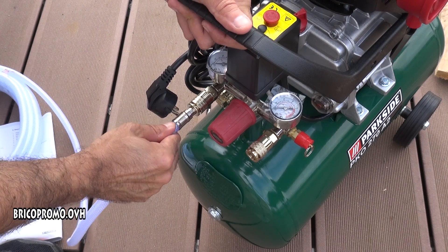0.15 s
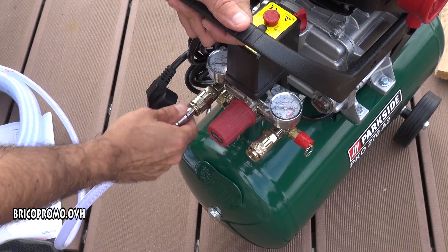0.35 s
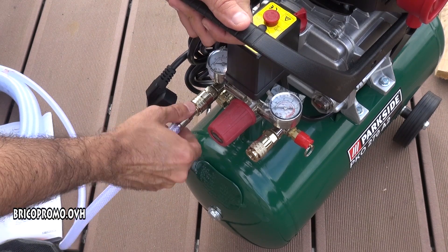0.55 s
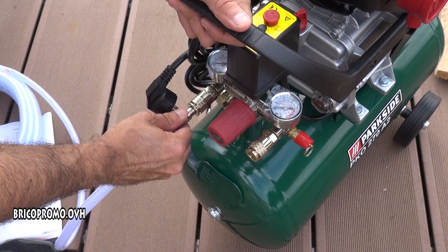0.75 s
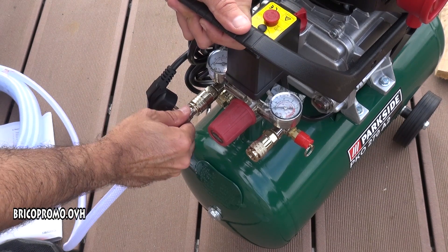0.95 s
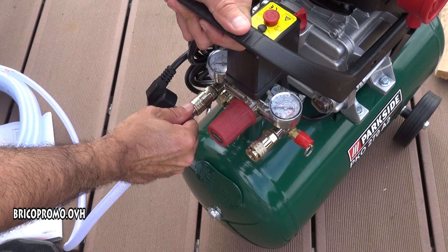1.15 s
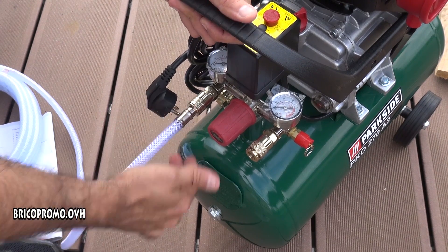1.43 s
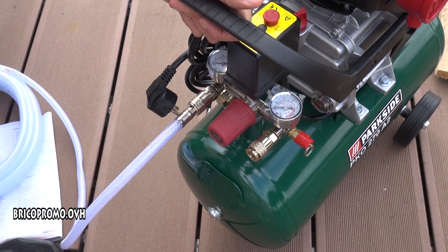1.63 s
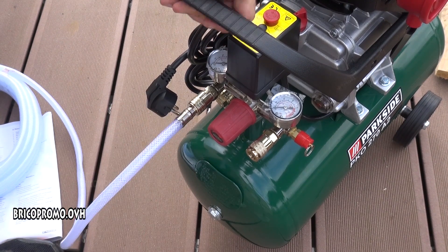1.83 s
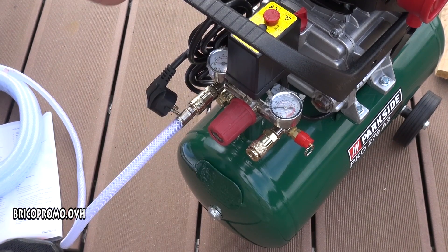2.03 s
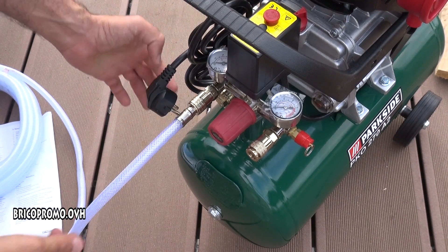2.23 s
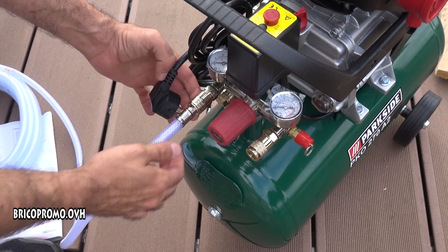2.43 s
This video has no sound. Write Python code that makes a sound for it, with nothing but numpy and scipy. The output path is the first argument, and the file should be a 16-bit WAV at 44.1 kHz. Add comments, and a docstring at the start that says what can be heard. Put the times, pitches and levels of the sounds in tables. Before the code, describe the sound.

Close up on an outdoor deck, an air hose connector rattles and knocks against a coupling, snaps in with a metallic ring, followed by low thumps, a brief scrape and a hollow plastic tap over low wind rumble.

```python
"""Outdoors on a deck: wind buffets the microphone over a hush and a faint motor line; a far bird's whistle falls.
A hose fitting is worked into the brass quick coupling of a small compressor: light knocks, firm blows and
thin ticks, then a ball-lock snap rings sleeve, fitting and steel tank. Soft bumps come near the microphone,
a short scuff crosses the boards, and the plastic cover is knocked, then again faintly.
Struck parts are damped sines plus noise smeared by the contact; the rest is shaped noise and two tones."""
import sys
import numpy as np
from scipy import signal
from scipy.fft import rfft, irfft
from scipy.io import wavfile
from scipy.ndimage import map_coordinates

SR = 44100
rng = np.random.default_rng(int(sys.argv[2]) if len(sys.argv) > 2 else 0)


def file_out(sig):
    """Save sig as 16-bit WAV at sys.argv[1]."""
    # one column per channel
    cols = np.atleast_2d(sig).T
    # limit, then scale
    lim = np.clip(cols, -1, 1)
    pcm = np.round(lim * 32767).astype(np.int16)
    wavfile.write(sys.argv[1], SR, pcm)


def invert_db(x):
    """Field ratio 10**(x/20) for x, a level in decibels (scalar or array-like)."""
    u = np.asarray(x, float) / 20
    return 10 ** u


N = 114660

# gusts: t/s, thud level/dB, flutter level/dB
GUSTS = [(0, -23.5, -101), (.1, -39, -66.5), (.33, -25.5, -55), (.448, -21, -54.5), (.49, -29, -59.5),
         (.63, -31, -72), (.69, -28, -62.5), (.78, -16.5, -42.5), (.96, -25.5, -55), (1.02, -30, -84),
         (1.12, -32.5, -54), (1.25, -39.5, -72), (1.31, -24.5, -65), (1.4, -31, -57), (1.44, -20.5, -66),
         (1.51, -19, -65), (1.56, -24, -70.5), (1.66, -32.5, -53.5), (1.69, -21, -37), (1.79, -36, -48.5),
         (1.89, -26, -48.5), (2.08, -29.5, -63), (2.17, -24.5, -76.5), (2.33, -32.5, -78), (2.4, -46, -68),
         (2.47, -28, -74), (2.6, -46.5, -78)]
# wind spectra, relative: f/Hz, level/dB
THUD_SPECTRUM = [(8, 10.5), (20, 9), (50, -4), (80, -38.5)]
RUMBLE_SPECTRUM = [(45, -16.5), (80, 5.5), (140, -16), (200, -39)]
FLUTTER_SPECTRUM = [(110, -14.5), (160, 5), (300, -19), (500, -25.5)]
RUMBLE_OVER_MEAN_DB = 1  # over the dB mean of thud and flutter

# outdoor hush, relative density: f/Hz, level/dB per Hz
HUSH_SPECTRUM = [(250, -4.5), (1100, -13.5), (1900, -19), (3200, -19.5), (5500, -23), (7400, -31),
                 (15700, -36), (16500, -48.5)]
HUSH_DB, HUSH_FADE_DB_PER_S = -63.5, 1
MOTOR_HZ, MOTOR_DB = 1199, -74
BIRD_S, BIRD_HZ, BIRD_FALL_HZ_PER_S, BIRD_DB = 0.15, 8100, 6500, -79

# light knocks while the hand works the fitting: t/s, tank level/dB before PART_DB
LIGHT_KNOCKS = [(0.091, -39), (0.156, -39), (.215, -33.5), (.271, -40.5), (.331, -41), (.478, -37.5),
                (.747, -35.5), (.756, -35), (.805, -36.5), (0.822, -38), (.891, -37.5), (.902, -37.5),
                (1.422, -39), (1.438, -46), (1.458, -40.5)]
KNOCK_FITTING_DB, KNOCK_CONTACT_MS = -11, 1  # fitting relative to tank
KNOCK_GRIP_T60_S, KNOCK_LOWPASS_HZ = 0.8, 750
# firm blows: t/s, tank level/dB, fitting level/dB, sleeve level/dB (all before PART_DB), contact/ms
FIRM_BLOWS = [(0.3544, -17.5, -31, -54.5, 1.3), (0.526, -44.5, -45.5, -64, 1.2),
              (1.066, -36.5, -55.5, -86, 1.4), (1.0774, -40, -28, -50, 0.49),
              (1.0784, -20, -31.5, -58.5, 1.52), (1.108, -6.5, -6.5, -6, 0.54),
              (1.283, -32.5, -46.5, -68, 1.8), (1.2939, -24.5, -29.5, -55, 1.21)]
# mode pitches of tank, fitting, sleeve: f/Hz
TANK_HZ = [422, 485, 570, 637, 775, 890, 1058, 1385, 1485, 1615]
FITTING_HZ = [2110, 2632, 2836, 3663, 4070, 5470, 5701]
SLEEVE_HZ = [6466, 6793, 9680]
# their modes in the same order, relative to the part, before scatter and grip: level/dB, t60/s
TANK_MODES = [(-11.5, 0.27), (2.5, 0.077), (-14.5, 0.48), (-5, 0.13), (-3.5, 0.28), (-15.5, 0.17),
              (-18.5, 0.058), (-8, 0.12), (-12.5, 0.2), (-23, 0.3)]
FITTING_MODES = [(-19.5, 0.13), (-8.5, 0.28), (9.5, 0.035), (-4, 0.086), (-13.5, 0.25), (-12.5, 0.25),
                 (-14, 0.083)]
SLEEVE_MODES = [(-14, 0.17), (-11.5, 0.079), (7, 0.034)]
# bands of the many small modes of tank, fitting, sleeve: low f/Hz, high f/Hz, top f/Hz of the crack
DENSE_BANDS = [(400, 1600, 1200), (2050, 5900, 3900), (5900, 13000, 16000)]
# their crack and rattle, relative to the part: crack level/dB, crack t60/s, rattle level/dB, rattle t60/s
DENSE_DECAYS = [(3, 0.041, -6.5, 0.18), (11.27, 0.015, -0.5, 0.2), (20, 0.002, -1, 0.14)]
PART_DB = -9
SWARM_MODES, SWARM_SHARE = 140, 0.35  # share of the rattle that is discrete modes
LOW_EDGE_HZ = 375  # small parts radiate little lower
GRIP_DB_PER_MS, GRIP_LONG_S = 4, 0.25  # slower contact: stiller rattle; a mode of this t60 loses it in full
SHELL_HZ = 775  # main tank mode, spared by the grip
MODE_SCATTER_DB, MODE_ROUGH, SWELL_CYCLES = 1.5, 0.6, 0.66
RISE_PER_CONTACT = 0.1  # longer contacts start softer

# ticks of balls, spring and grit: t/s, level/dB, f/Hz near the top of the band
TICKS = [(.325, -58.5, 4930), (0.459, -61.5, 5150), (0.744, -54, 7500), (0.801, -58, 7160),
         (0.819, -56, 3600), (1.679, -52.5, 3480), (1.685, -59.5, 6550), (1.717, -62, 4460),
         (2.497, -64, 4800)]

# soft low bumps near the microphone: t/s, level/dB, f/Hz
THUMPS = [(1.4, -37, 210), (1.682, -24.5, 90), (1.691, -33, 298.4)]
THUMP_CYCLES = 40  # cycles to fall 60 dB

# stroke on the boards: t/s, body level/dB, air level/dB
SCUFF_STROKE = [(1.85, -77.5, -86), (1.916, -68.5, -71), (1.95, -50.5, -61), (1.98, -42.5, -56),
                (2.008, -39, -55.5), (2.03, -54.5, -61.5), (2.044, -41, -60), (2.058, -46.5, -52.5),
                (2.1, -61.5, -64), (2.11, -81, -101)]
# scuff spectra, relative density: f/Hz, level/dB per Hz
SCUFF_BODY_SPECTRUM = [(900, -13), (1700, -8), (2400, 0), (2900, 4.5), (3800, -4), (5500, -12), (7000, -32)]
SCUFF_AIR_SPECTRUM = [(5000, 17), (8000, 3), (11000, 5.5), (15500, -2)]

# knocks on the plastic cover: t/s, level/dB
COVER_KNOCKS = [(2.383, -23.5), (2.498, -44)]
# cover mode pitches: f/Hz
COVER_HZ = [328, 528, 615, 777, 910, 1345]
# cover modes in the same order, relative to the knock, before scatter: level/dB, t60/s
COVER_MODES = [(-20.5, 0.12), (3, 0.055), (-15, 0.1), (-23, 0.57), (-10.5, 0.042), (-13, 0.057)]
COVER_TICK_DB, COVER_RATTLE_DB, COVER_DULL_DB = -19, -29.5, -23  # relative to the knock

CLIP_LEVEL, LOWPASS_HZ = 1.05, 16400


def unit(x):
    """Scale to rms 1."""
    return x / np.sqrt(np.mean(x ** 2) + 1e-20)


def curves(rows):
    """Interpolate each column after the time to one value per sample."""
    s, *cols = np.transpose(rows)
    return [np.interp(np.arange(N) / SR, s, c) for c in cols]


def wobble(rate_hz):
    """Smooth random curve, rate_hz knots a second."""
    knots = rng.standard_normal(int(N * rate_hz / SR) + 4)
    return map_coordinates(knots, [np.arange(N) * rate_hz / SR])


def noise(spectrum):
    """Noise of rms 1 with a (Hz, dB) spectrum, falling 40 dB in the octave outside it."""
    f, db = np.transpose(spectrum)
    f = np.r_[f[0] / 2, f, f[-1] * 2]
    db = np.r_[db[0] - 40, db, db[-1] - 40]
    hz = np.fft.rfftfreq(N, 1 / SR) + 1
    gain = invert_db(np.interp(np.log(hz), np.log(f), db))
    return unit(irfft(rfft(rng.standard_normal(N)) * gain, N))


def band(size, lo_hz, hi_hz):
    """Stretch of band noise of rms 1."""
    hz = np.fft.rfftfreq(size, 1 / SR) + 1
    loss = np.sqrt((1 + (lo_hz / hz) ** 12) * (1 + (hz / hi_hz) ** 12))
    return unit(irfft(rfft(rng.standard_normal(size)) / loss, size))


def decay(t, db, t60_s):
    """Exponential fall from db, losing 60 dB in t60_s."""
    return invert_db(db - 60 * t / t60_s)


def lumpy(spectrum, depth_db, rate_hz):
    """Shaped noise of rms 1 with a randomly swaying level."""
    return unit(noise(spectrum) * invert_db(depth_db * wobble(rate_hz)))


def wind():
    """Pressure lumps on the microphone: thud, a fluttering top and the rumble between them."""
    thud_db, flutter_db = curves(GUSTS)
    rumble_db = (thud_db + flutter_db) / 2 + RUMBLE_OVER_MEAN_DB
    thud = invert_db(thud_db) * noise(THUD_SPECTRUM)
    rumble = invert_db(rumble_db) * lumpy(RUMBLE_SPECTRUM, 1.0, 5.9)
    return thud + rumble + invert_db(flutter_db) * lumpy(FLUTTER_SPECTRUM, 3.2, 24)


def outdoors():
    """Slowly fading hush, a faint unsteady motor line and a far bird's falling, dying whistle."""
    t = np.arange(N) / SR
    hush_db = HUSH_DB - HUSH_FADE_DB_PER_S * t + 1.5 * wobble(6)
    motor_phase = 2 * np.pi * MOTOR_HZ * t + 0.77 * wobble(36)
    motor = invert_db(MOTOR_DB + 0.72 * wobble(11)) * np.sin(motor_phase)
    bird_cycles = BIRD_HZ * t - BIRD_FALL_HZ_PER_S * t * t / 2
    bird = np.clip(1 - t / BIRD_S, 0, 1) * np.sin(2 * np.pi * bird_cycles)
    return invert_db(hush_db) * noise(HUSH_SPECTRUM) + motor + invert_db(BIRD_DB) * bird


def ring(pitches_hz, modes, t, grip_db=0):
    """Damped sines, quick to swell, beating unevenly; a grip lowers the long modes most, the shell not at all."""
    hz = np.array(pitches_hz)[:, None]
    db, t60 = np.transpose(modes)[:, :, None]
    luck = rng.standard_normal((3, len(modes), 1))
    beat = 1 + MODE_ROUGH * np.sin(hz ** 2 / 2e5 * luck[1] * t) * np.cos(hz / 16 * luck[2] * t)
    grip_loss_db = grip_db * t60 / GRIP_LONG_S * (hz != SHELL_HZ)
    fall = decay(t, db + MODE_SCATTER_DB * luck[0] - grip_loss_db, t60)
    swell = 1 - np.exp(-t * hz / SWELL_CYCLES)
    return np.sum(fall * beat * swell * np.sin(2 * np.pi * hz * t), axis=0)


def add(track, s, sound, contact_ms):
    """Lay a sound in at s, smeared by a scratchy, colourless contact peaking near contact_ms."""
    u = np.arange(1024) / SR * 1000 / contact_ms
    shape, push = u * np.exp(-u), rng.standard_normal(len(u))
    for _ in range(16):  # alternate between the time envelope and a flat spectrum
        z = rfft(push * np.sqrt(shape))
        push = irfft(z / np.abs(z))
    t_ms = np.arange(len(sound)) / SR * 1000
    rise = 1 - np.exp(-(t_ms / (RISE_PER_CONTACT * contact_ms)) ** 2)
    hit = signal.fftconvolve(sound * rise, push / np.linalg.norm(push))
    track[round(s * SR):][:len(hit)] += hit


def swarm(t, lo_hz, hi_hz, t60_s):
    """Crowd of small modes scattered over a band; the higher tend to die sooner."""
    place, size, life, phase = rng.random((4, SWARM_MODES, 1))
    hz = lo_hz + (hi_hz - lo_hz) * place
    fade = decay(t, -8 * size, t60_s * (1.5 - 0.46 * place) * (0.51 + 0.65 * life))
    return np.sum(fade * np.sin(2 * np.pi * (hz * t + phase)), axis=0) * np.sqrt(4 / SWARM_MODES)


def struck(t, swarms, contact_ms, *levels_db):
    """Tank, fitting and sleeve answer one blow: main modes, a crack and a dense rattle."""
    grip_db = GRIP_DB_PER_MS * contact_ms
    pitches = TANK_HZ, FITTING_HZ, SLEEVE_HZ
    mode_sets = TANK_MODES, FITTING_MODES, SLEEVE_MODES
    parts = zip(levels_db, pitches, mode_sets, DENSE_BANDS, DENSE_DECAYS, swarms)
    out = np.zeros(len(t))
    for db, hz, modes, (lo, hi, top), (crack_db, crack_t60, rattle_db, rattle_t60), crowd in parts:
        modal = ring(hz, modes, t, grip_db)
        crack = decay(t, crack_db, crack_t60) * band(len(t), lo, top)
        discrete = invert_db(rattle_db) * crowd[:len(t)]
        diffuse = decay(t, rattle_db, rattle_t60) * band(len(t), lo, hi)
        rattle = SWARM_SHARE * discrete + (1 - SWARM_SHARE) * diffuse
        out += invert_db(db + PART_DB) * (modal + crack + invert_db(-grip_db) * rattle)
    return out


def coupling():
    """Light knocks are dulled and further damped by the grip; firm blows ring on, the snap the loudest."""
    firm, light, t = np.zeros(N + SR), np.zeros(N + SR), np.arange(16384) / SR
    swarms = [swarm(t, lo, hi, t60) for (lo, hi, _), (*_, t60) in zip(DENSE_BANDS, DENSE_DECAYS)]
    for s, *levels_db, contact_ms in FIRM_BLOWS:
        add(firm, s, struck(t, swarms, contact_ms, *levels_db), contact_ms)
    t = t[:8192]
    grip = decay(t, 0, KNOCK_GRIP_T60_S)
    for s, db in LIGHT_KNOCKS:  # tank and fitting only
        knock = struck(t, swarms, KNOCK_CONTACT_MS, db, db + KNOCK_FITTING_DB)
        add(light, s, grip * knock, KNOCK_CONTACT_MS)
    dull = signal.lfilter(*signal.butter(1, KNOCK_LOWPASS_HZ, fs=SR), light)
    both = (firm + dull)[:N]
    return signal.sosfilt(signal.butter(4, LOW_EDGE_HZ, "high", fs=SR, output="sos"), both)


def ticks():
    """Thin ticks of balls, spring and grit: a pitched band of noise under a brief broad click."""
    out, t = np.zeros(N + SR), np.arange(SR // 3) / SR
    for s, db, hz in TICKS:
        pitched = decay(t, db, 0.078) * band(len(t), hz / 1.58, hz * 1.06)
        click = decay(t, db + 1, 0.0086) * band(len(t), 1200, 10400)
        add(out, s, pitched + click, contact_ms=0.53)
    return out[:N]


def thumps():
    """Dull bumps: low band noise with a soft start; the higher ones die sooner."""
    out, t = np.zeros(N + SR), np.arange(SR // 3) / SR
    for s, db, hz in THUMPS:
        envelope = decay(t, db, THUMP_CYCLES / hz) * (1 - np.exp(-t * hz / 2))
        add(out, s, envelope * band(len(t), hz / 1.3, hz * 1.27), contact_ms=2.7)
    return out[:N]


def scuff():
    """Friction: a throaty body and an airy top, both grainy, under one stroke."""
    body_db, air_db = curves(SCUFF_STROKE)
    on = np.arange(N) / SR > SCUFF_STROKE[0][0]
    body = invert_db(body_db + 2.05 * wobble(300)) * noise(SCUFF_BODY_SPECTRUM)
    air = invert_db(air_db + 2.7 * wobble(300)) * noise(SCUFF_AIR_SPECTRUM)
    return on * (body + air)


def cover():
    """Dull knocks on the plastic cover: its modes, low noise, a thin tick and a rattle."""
    out, t = np.zeros(N + SR), np.arange(SR // 3) / SR
    for s, db in COVER_KNOCKS:
        dull = decay(t, COVER_DULL_DB, 0.56) * band(len(t), 275, 910)
        tick = decay(t, COVER_TICK_DB, 0.01) * band(len(t), 1830, 13750)
        rattle = decay(t, COVER_RATTLE_DB, 0.15) * band(len(t), 703, 5800)
        knock = ring(COVER_HZ, COVER_MODES, t) + dull + tick + rattle
        add(out, s, invert_db(db) * knock, contact_ms=0.44)
    return out[:N]


def scene():
    """Sum all sources at one microphone."""
    return (wind() + outdoors() + coupling() + ticks() + thumps() + scuff() + cover())[None]


def top_cut(x):
    """Nothing passes above the cut-off."""
    return signal.sosfilt(signal.butter(12, 21850, fs=SR, output="sos"), x)


def record(dry):
    """The converter clips peaks with a rounded knee; a zero-phase low-pass ends the band."""
    clipped = dry / (1 + np.abs(dry / CLIP_LEVEL) ** 6) ** (1 / 6)
    lowpass = signal.butter(6, LOWPASS_HZ, fs=SR, output="sos")
    return top_cut(signal.sosfiltfilt(lowpass, clipped))


dry = scene()
out = record(dry)
file_out(out)
```